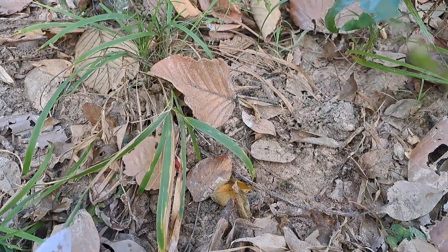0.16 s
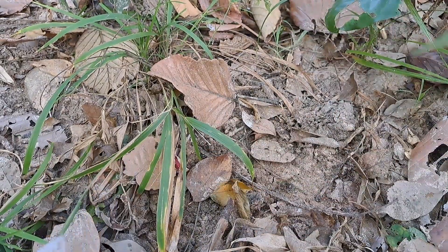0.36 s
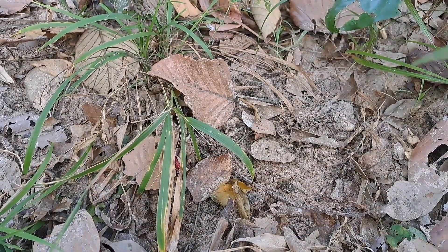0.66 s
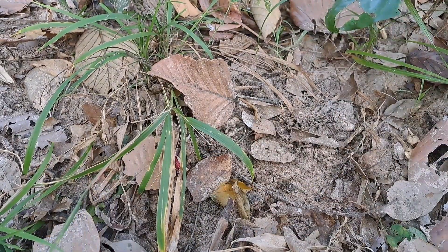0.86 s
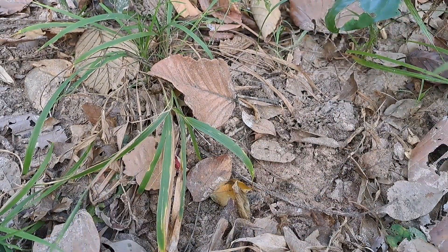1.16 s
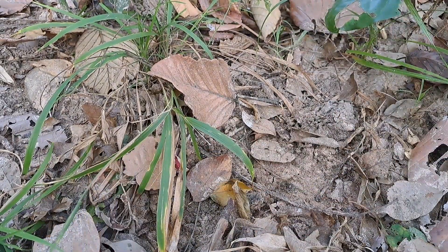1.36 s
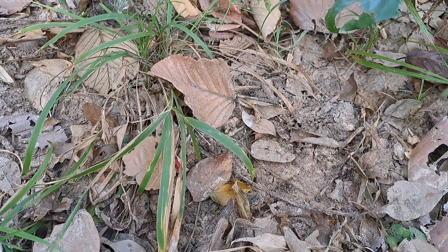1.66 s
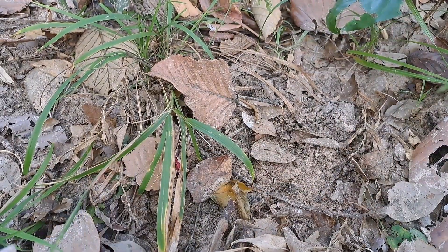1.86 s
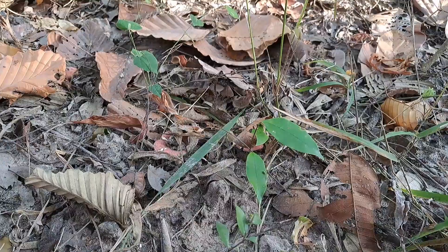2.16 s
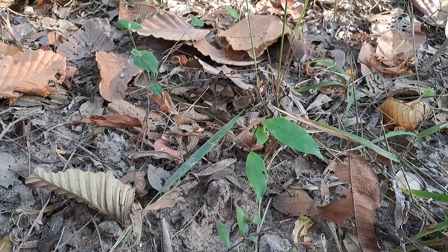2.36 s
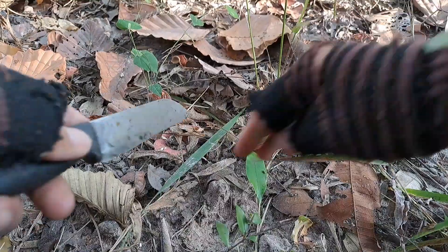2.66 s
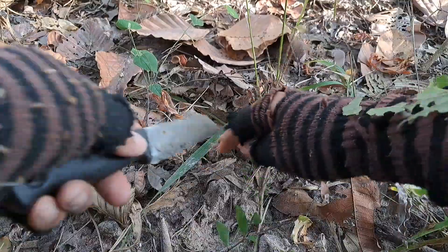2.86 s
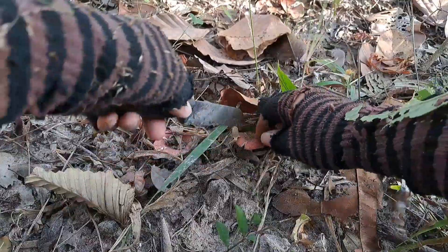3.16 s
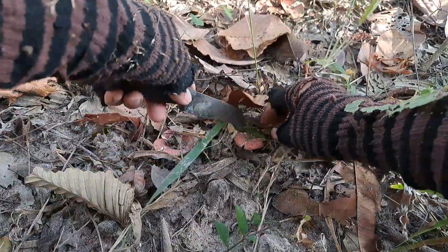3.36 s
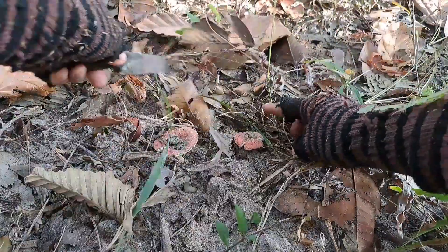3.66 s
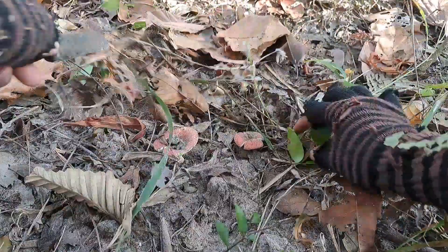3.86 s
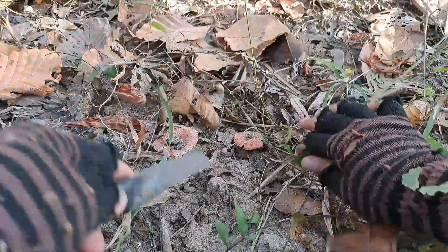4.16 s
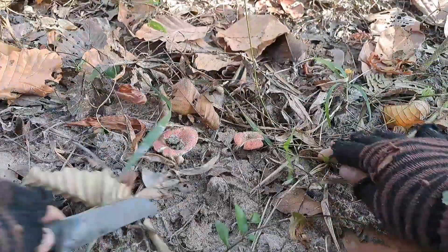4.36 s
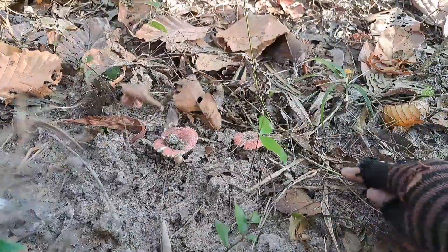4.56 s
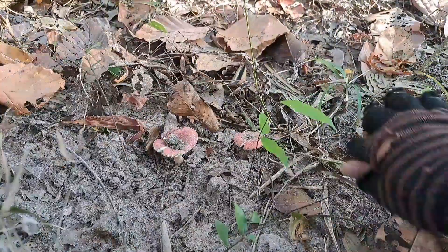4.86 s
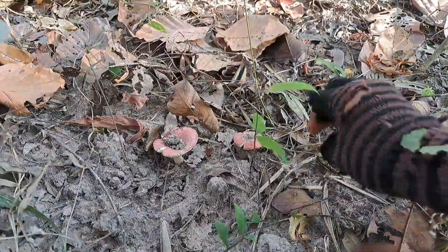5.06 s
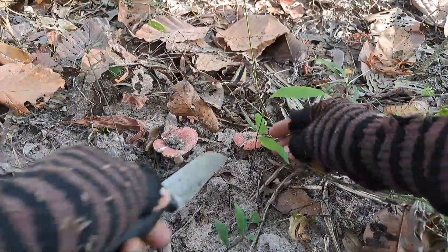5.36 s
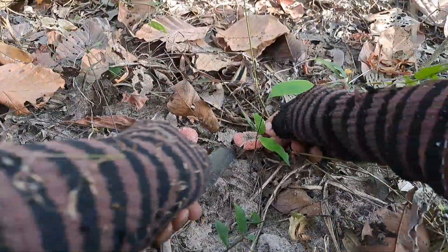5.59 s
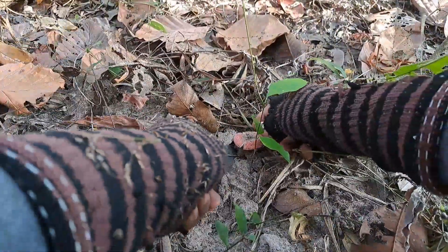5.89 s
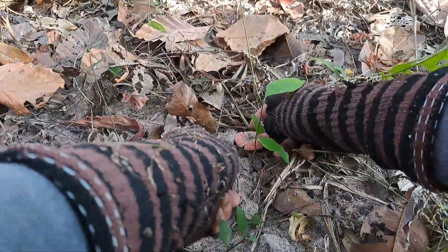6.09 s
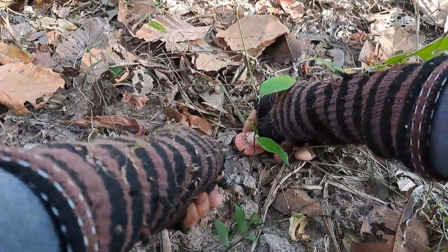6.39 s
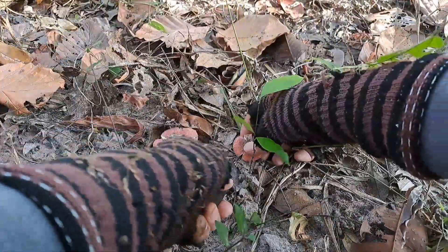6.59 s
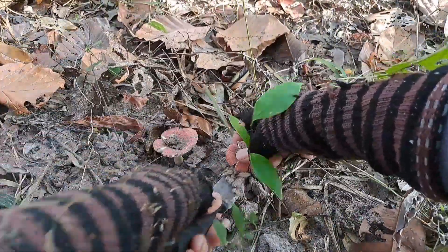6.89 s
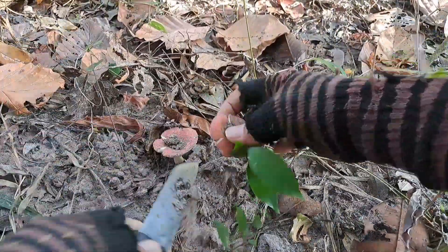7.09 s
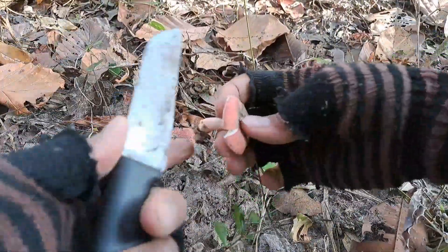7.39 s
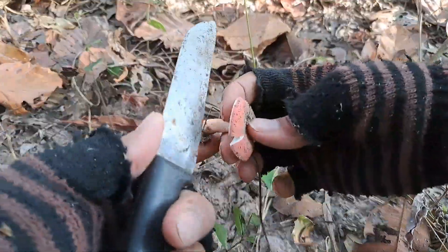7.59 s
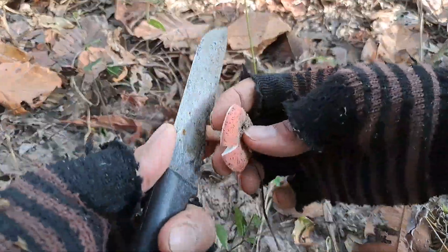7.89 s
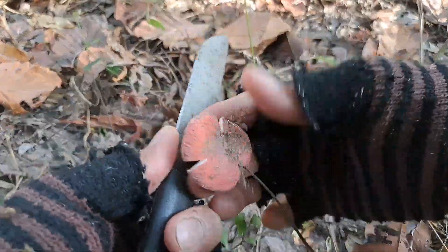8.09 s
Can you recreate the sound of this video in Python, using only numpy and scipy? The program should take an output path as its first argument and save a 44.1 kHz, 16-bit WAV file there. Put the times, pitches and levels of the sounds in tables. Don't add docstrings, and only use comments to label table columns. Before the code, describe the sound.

Close, dry stereo sound of digging in leaf litter. From 0 to 1.2 s, leaves rustle and crackle with low soil thuds, small twig snaps and a bright blade clink near 0.35 s. Around 1.4-1.7 s steel ticks and rings briefly several times against ground; then it nearly quiets. At about 1.96 s the scene changes abruptly: light rustling, soft bumps, then a sharp crack at 2.9 s. Loud crisp raking bursts at 3.4-3.9 s, with snapping stems and a hollow thud near 3.8 s. Hard cracks come around 4.2 s, and the densest sweeping at 4.4-4.9 s, a large curled leaf dragging raspily. A brief crackle at 5.35 s leads to quieter prying, a faint high squeak near 5.8 s, grass slides at 6.5-7 s, and rustling. After 7.3 s it almost stops, with small stem ticks and scrapes near 8 s. Soft low rumble and distant air lie underneath.

```python
import sys
import numpy as np
from scipy import signal
from scipy.fft import rfft, irfft, next_fast_len
from scipy.io import wavfile
from scipy.ndimage import uniform_filter1d, map_coordinates

SR = 44100
rng = np.random.default_rng(int(sys.argv[2]) if len(sys.argv) > 2 else 0)


def unload_wav(signal):
    wavfile.write(
        sys.argv[1],
        SR,
        np.round(np.clip(np.atleast_2d(signal).T, -1, 1) * 32767).astype(np.int16),
    )


def natural_amplitude(level_db):
    exponent = np.asarray(level_db, float) / 20
    return 10 ** exponent


N = 363207

# [t/s, lead of the left microphone/samples, spread of places/samples]
PLACE = [(0, 20.5, 5), (.9, 22, 5), (1.2, 22, 6), (1.35, -2, 13), (2.1, 1, 12), (2.28, -12, 9),
         (2.5, 0, 12), (2.92, 1.5, 5), (3.45, 1.5, 5), (3.58, 5, 5), (3.85, 8, 6), (4.145, 8, 9),
         (4.17, -6.5, 5), (4.36, -7, 9), (4.42, 12.5, 6), (4.62, 13.5, 5), (4.76, 16, 5), (5.03, 16, 9),
         (5.1, -7, 11), (5.42, -7, 10), (5.65, 3.5, 7), (6.1, 1, 6), (7.05, 2, 6), (7.5, 6, 13),
         (7.9, 7, 4), (8.24, 7.5, 8)]

# [t/s, half length/s, crackle level/dB, depth = soil re crackle/dB]
FUMBLES = [(.14, 0.18, -46.5, -0.5), (.35, 0.14, -59, 3.5), (.52, 0.089, -49.5, -16), (.76, 0.1, -54, -17),
           (.805, 0.012, -51, -26), (.842, 0.016, -49, -32), (.865, 0.022, -41.5, -27),
           (.905, 0.057, -46.5, -0.5), (.962, 0.023, -48.5, -11), (1.02, 0.096, -50.5, -3),
           (1.17, 0.069, -51, 2), (1.475, 0.1, -52.5, -3.5), (1.596, 0.11, -56.5, -2.5),
           (1.788, 0.041, -68, 6), (1.88, 0.047, -66, -10)]
SWEEPS = [(1.996, 0.12, -53.5, -2), (2.265, 0.1, -51.5, -8), (2.68, 0.3, -52.5, -14.5),
          (2.79, 0.27, -62, 5.5), (2.932, 0.033, -33, -15), (3.0, 0.042, -48, -24),
          (3.15, 0.16, -45.5, -17.5), (3.295, 0.22, -48.5, -15), (3.435, 0.034, -44, -2.5),
          (3.467, 0.066, -29.5, -24), (3.503, 0.074, -28.5, -15.5), (3.544, 0.028, -29, -11.5),
          (3.676, 0.071, -31.5, -15), (3.77, 0.085, -34, -19), (3.837, 0.07, -34.5, -5.5),
          (3.957, 0.031, -40.5, -23), (4.208, 0.029, -35, -15.5), (4.41, 0.15, -39, -10.5),
          (4.483, 0.093, -31, -13), (4.532, 0.12, -29.5, -11), (4.577, 0.066, -31, -9.5),
          (4.663, 0.062, -27.5, -10.5), (4.715, 0.079, -31, -12.5), (4.809, .15, -38, -5.5),
          (5.076, 0.043, -55.5, -27), (4.978, 0.017, -53, -20), (5.347, 0.023, -43, -20),
          (5.375, 0.024, -43.5, -7), (5.397, 0.053, -46.5, -9), (2.77, 0.023, -49.5, -11),
          (3.125, 0.025, -46.5, -12)]
PRISES = [(5.76, 0.27, -50.5, -6.5), (5.87, 0.16, -53, -29), (6.036, 0.066, -51.5, -6),
          (6.38, 0.19, -57, -5.5), (6.465, 0.054, -49.5, -26), (6.551, 0.065, -51, -16),
          (6.707, 0.11, -54, -10.5), (6.781, 0.054, -47, -11), (6.92, 0.17, -46.5, -17.5),
          (6.992, 0.03, -44, -23), (7.2, 0.2, -48.5, -10), (7.5, 0.13, -67, 0), (7.967, 0.06, -60.5, -12),
          (8.05, 0.048, -58, -36)]
# [t/s, crackle level/dB, depth/dB]
STIR = [(0, -48, -54), (.62, -60, -15), (1.34, -64, 5), (1.95, -71.5, -9), (1.97, -60.5, 1.5),
        (2.42, -67.5, -2.5), (2.9, -51.5, -2.5), (3.36, -59, 4), (3.6, -42, -5), (4.05, -47.5, -7),
        (4.3, -47.5, -10), (5.0, -60.5, -5.5), (5.5, -53.5, -8.5), (6.2, -61.5, -9), (7.1, -55, -12),
        (7.65, -70.5, -27), (7.87, -82.5, -1), (8.24, -66, -20)]

# [f/Hz, level/dB per Hz]
CRISP = [(2350, -10.5), (4000, -6), (5260, -3.5), (6380, -4.5), (7970, -2), (9030, -4.5), (11500, -2.5),
         (12700, 1), (14900, -0.5), (15600, -6)]
BODY = [(740, -36), (1250, -14.5), (1350, -5.5), (1840, -6.5), (3180, -4), (4000, -4), (5200, -7),
        (8800, -120)]
SOIL = [(190, -9.5), (330, -8.5), (450, -7.5), (589, -5.5), (770, -3), (1040, -10), (1170, -9), (1300, -10),
        (1700, -32), (2750, -120)]

# [t/s, peak level/dB, centre f/Hz, left re right/dB]
STEMS = [(0.5884, -29.5, 3420, -9.5), (0.7193, -33, 2140, 0), (0.857, -34, 5710, -1), (0.898, -28, 3890, 4),
         (1.116, -38, 4270, 4), (1.1555, -36, 2290, -3), (1.1628, -30, 1930, 7), (1.725, -45, 5800, -8),
         (1.754, -49, 5600, -1), (1.8738, -44, 3910, -17), (1.79, -42, 2260, -3), (1.8067, -45, 5200, -10),
         (1.882, -42.5, 3920, -17), (1.9623, -49, 1950, -1), (2.493, -39.5, 1900, 3),
         (2.8988, -29.5, 4770, -7), (2.9344, -27, 5200, -2), (3.2074, -28, 2190, 10.5),
         (3.2979, -25.5, 4580, -7.5), (3.428, -30, 3800, 0), (3.4558, -15, 5350, -5), (3.55, -20, 2100, -2),
         (3.7338, -26, 5000, -1), (3.793, -25, 4400, -2), (3.962, -30.5, 5900, 4.5), (3.537, -29, 8080, 4),
         (3.552, -13, 8100, 3), (4.143, -29.5, 2690, 18.5), (4.144, -29, 4780, 17), (4.199, -19, 6600, -10),
         (4.472, -32, 2870, 1), (4.6577, -26.5, 2800, 4), (4.773, -17, 3380, 3.5), (5.3498, -36, 5330, -9),
         (5.364, -28.5, 2050, -10), (5.372, -36.5, 2210, -16), (5.629, -39, 7930, 20),
         (5.701, -33, 1890, -2.5), (5.8336, -38, 2120, -9), (5.8335, -39, 3600, -7), (5.852, -40, 4500, 0),
         (6.6824, -38, 2050, -7), (6.766, -41, 3240, -5), (6.794, -35, 5280, -1), (7.097, -48, 1790, 2),
         (7.509, -52, 5440, 2), (6.988, -28, 4990, -4), (6.988, -40, 2060, -4), (7.003, -30, 5000, -2),
         (7.9599, -31, 5140, 3), (7.9685, -32.5, 5340, -11)]
# [t/s, peak level/dB, centre f/Hz, left re right/dB]
MORE_STEMS = [(.3227, -37, 2140, -4), (.3345, -32, 2000, -6), (.401, -32, 3700, -5), (.6749, -36, 11900, -1),
              (.7394, -34, 2380, 0), (.856, -38, 12000, 6), (1.7784, -49, 9000, 2), (1.9903, -40, 1720, -2),
              (2.1061, -46, 7000, -1), (2.2974, -37, 5200, -2), (3.2384, -31, 9800, 3), (3.2574, -33, 2240, 6),
              (3.292, -27, 11000, -6), (3.3278, -36.5, 7420, -1), (3.4391, -29, 11400, 2),
              (3.6504, -28, 9100, -2), (3.7654, -28, 7110, -2.5), (4.198, -20, 9800, -12), (4.39, -29, 14000, 2),
              (4.6504, -21, 12800, -10), (4.7414, -28, 2750, 6), (5.3056, -44, 4480, -2),
              (5.3221, -37, 4500, -6), (5.3954, -35, 7770, -12), (5.4294, -39, 2160, -5),
              (5.6034, -48, 2500, -3), (6.1876, -46, 8260, 0), (6.2794, -39.5, 2210, -1),
              (6.3203, -61, 2310, -1), (7.4318, -41, 12900, -5), (7.9309, -51, 5800, 0), (7.94, -49, 6500, -4),
              (7.9544, -44, 5220, -5)]
# [t/s, peak level/dB, left re right/dB]
RIBS = [(.0263, -36, 4), (0.323, -40, -4), (0.8033, -32.5, -11), (0.834, -39, 1), (1.098, -36.5, 4),
        (2.4, -48, 2), (2.58, -48, 2), (4.977, -37, -5), (5.374, -25, -19), (7.547, -44, 0),
        (2.9217, -29, 7), (2.925, -18.5, 5.5), (3.735, -21, -1.5), (3.737, -26, 0), (3.788, -20, 11),
        (4.1917, -19.5, -18), (4.198, -21.5, -14.5), (4.301, -26, -8), (4.375, -26, 4), (4.6289, -27, 3),
        (4.6594, -26, 13), (5.336, -34, -2.5), (7.5067, -37, -4)]

# [t/s, peak level/dB, centre f/Hz]
THUDS = [(0.144, -34.5, 268), (0.223, -39, 209), (0.269, -33.5, 206), (0.324, -34.5, 620),
         (0.334, -35, 623), (0.91, -28, 900), (.912, -34.5, 457), (3.46, -38, 1000), (3.55, -38, 800),
         (0.915, -54, 243), (1.147, -34.5, 363), (1.169, -40.5, 159), (1.433, -39.5, 905),
         (1.436, -37, 432), (1.445, -42.5, 186), (1.473, -45, 207), (1.54, -31.5, 466), (1.595, -38.5, 650),
         (1.801, -49, 474), (4.929, -43, 527), (1.638, -40, 493), (1.647, -40, 475), (2.43, -49, 294),
         (2.473, -41, 270), (3.494, -42, 960), (3.809, -26, 307), (3.8087, -34, 925), (3.827, -23.5, 765),
         (4.514, -23.5, 301), (4.84, -32.5, 123), (5.05, -45, 376), (5.236, -46, 376), (6.839, -43, 248),
         (7.371, -48, 920), (7.372, -43, 420), (2.768, -43, 700), (2.3, -46, 350), (2.347, -45, 450),
         (2.635, -49, 750), (2.7, -44, 261)]

# [t/s, peak level/dB, low mode re peak/dB, long ring re peak/dB, left re right/dB]
CLINKS = [(.3505, -19.5, -14, -24, -14), (0.4, -32, -5, -40, -8), (1.4025, -34, -26, -19, -5.5),
          (1.4493, -28, -22, -45, -5), (1.471, -36, -21, -30, -3), (1.4775, -26.5, -28, -40, -9),
          (1.4995, -42, -8, -40, 1), (1.54, -31, -14, -24, -9.5), (1.544, -33, -8, -30, -9),
          (1.6405, -17.5, -12, -17.5, 8), (1.6449, -22, -3, -30, 8), (1.6675, -38, 2, -40, 11)]
# [f/Hz, level/dB, t60/s]
BLADE_MODES = [(12800, -29, .02), (12900, -20, .012), (13670, -0.5, 0.015), (13900, -25, .012)]

# [t/s, resonance f/Hz, level/dB]
CURL = [
    (4.44, 2690, -57.5),
    (4.48, 2810, -47.5),
    (4.535, 2604, -42),
    (4.58, 2414, -41),
    (4.62, 2203, -71),
    (4.68, 2500, -54.5),
    (4.77, 3020, -56),
    (4.85, 2240, -54),
    (4.96, 2200, -74),
]
# [t/s, resonance f/Hz, level/dB]
GRASS = [
    (6.45, 2826, -73),
    (6.56, 2360, -64.5),
    (6.65, 2303, -74.5),
    (6.79, 3100, -65),
    (6.93, 2504, -62.5),
    (7.03, 2410, -67.5),
]
# [t/s, resonance f/Hz, level/dB]
SQUEAK = [
    (5.745, 6570, -68),
    (5.795, 6130, -67),
    (5.83, 5800, -70),
    (5.845, 5330, -67),
    (5.875, 5300, -70),
    (5.895, 5600, -77),
    (5.91, 6150, -70),
    (5.928, 6400, -67),
    (5.942, 7100, -69),
]
# [t/s, resonance f/Hz, level/dB]
SCRAPE = [
    (7.896, 5400, -73),
    (7.915, 5680, -77),
    (7.925, 5600, -95),
    (7.935, 5800, -67),
    (7.99, 5180, -89),
    (8.0, 5060, -69),
    (8.035, 5100, -66),
    (8.07, 5070, -74),
    (8.09, 5200, -87),
]

# [f/Hz, level/dB per Hz]
GOUGES = [(0.147, .1, -46), (.91, 0.032, -43), (3.48, .06, -41), (3.552, 0.065, -42), (3.692, 0.073, -47),
          (3.814, 0.042, -42), (4.52, 0.17, -48), (4.698, .1, -48), (5.743, 0.17, -59), (6.5, 0.19, -62.5),
          (1.15, 0.039, -50), (6.145, 0.085, -65), (6.9, .2, -69)]
HOLLOW = [(560, -50), (720, -3.5), (900, -4.5), (1050, -0.5), (1250, -46)]

# [t/s, half length/s, rumble level/dB]
JOLTS = [(0.203, 0.2, -55.5), (1.147, 0.07, -47), (1.45, 0.066, -54), (1.794, 0.072, -52.5),
         (2.053, 0.31, -57), (2.82, 0.67, -57.5), (3.225, 0.067, -53.5), (3.66, .2, -55.5),
         (4.297, 0.4, -56), (4.57, 0.2, -53), (4.85, 0.17, -61), (5.413, 0.14, -55.5), (5.753, 0.78, -58),
         (7.117, 0.57, -54), (8.24, 0.23, -60)]
# [t/s, half length/s, level/dB]
GUST = [
    (7.873, 0.14, -75),
]
# [f/Hz, level/dB per Hz]
RUMBLE = [(13, -60), (24, -29), (35, -12.5), (54, 6.5), (71, 4), (97, -9.5), (110, -6), (140, -33.5),
          (240, -120)]
GROUND = [(65, -20.5), (110, 4), (199, -0.5), (243, -0.5), (330, -12), (430, -32.5), (730, -120)]
DRONE = [(180, -40), (300, -3.5), (519, -2), (614, -4), (870, -21), (1500, -60)]
AIR = [(400, -39), (870, -20), (3890, -32), (4370, -33.5), (5610, -27.5), (13500, -24), (16000, -30)]

RESTART_S = 1.961


def leaves():
    effort_db = raking(0)
    body_db = raking(0.42) - effort_db
    soil_db = raking(1) - effort_db
    pan_db = -3.5 + 0.14 * curves(PLACE)[0]
    tilt_db = 0.0917 * (effort_db + 49.5)
    level_tilt = np.zeros(N)
    restarted = np.arange(N) / SR >= RESTART_S

    sparse = np.clip((-35.5 - effort_db) / 25, 0.25, 1.2)
    slips = natural_amplitude(sparse * (0.13 * wobble(54) + 0.99 * wobble(120) + 0.9 * wobble(400)))

    crisp = grains(CRISP, count=90000, size=28, low_hz=3360, high_hz=16250, cycles=1.22, tail_db=2.0,
                   smooth=0.87, clump_db=1.06, narrow=0.4, pan_db=11.0)
    body = grains(BODY, count=30000, size=90, low_hz=1250, high_hz=4110, cycles=2.0, tail_db=1.0,
                  smooth=0.41, clump_db=1.16, narrow=0.28, pan_db=9.5)
    soil = grains(SOIL, count=9000, size=280, low_hz=291.0, high_hz=1426, cycles=2.0, tail_db=0.5,
                  smooth=0.22, clump_db=-0.43, narrow=0.12, pan_db=6.0)
    soil = unit(soil + np.where(restarted, 0.4, 0) * np.roll(soil, 38, axis=1))

    top = natural_amplitude(2.5) * patched(crisp, 1.2, tilt_db) * sides(2)[:, None]
    under = natural_amplitude(body_db - 1.58) * patched(body, 1.8, level_tilt)
    under = under + natural_amplitude(soil_db - 1.18) * patched(soil, 2.2, level_tilt)
    under = under + np.where(restarted, 0.27, 0.18) * np.roll(under, 19, axis=1)
    return (top + under) * unit(slips) * natural_amplitude(effort_db) * sides(pan_db)


def raking(per_depth):
    def strokes(rows):
        s, half_s, db, depth_db = np.transpose(rows)
        return swells(s, half_s, db + per_depth * depth_db)

    power = np.where(np.arange(N) / SR < RESTART_S, strokes(FUMBLES), strokes(SWEEPS + PRISES))
    stir_db, stir_depth_db = curves(STIR)
    return 10 * np.log10(power + natural_amplitude(2 * (stir_db + per_depth * stir_depth_db)))


def grains(points, count, size, low_hz, high_hz, cycles, tail_db, smooth, clump_db, narrow, pan_db):
    lead, spread = curves(PLACE)
    u = rng.random((count, 4))
    g = rng.standard_normal((count, 2))
    start = (u[:, 0] * N).astype(int)
    hz = low_hz * (high_hz / low_hz) ** u[:, 1]
    turns = hz[:, None] * np.arange(size) / SR
    waves = np.sin(2 * np.pi * (turns + u[:, 3:])) * np.exp(-turns / cycles)
    strength = natural_amplitude(-tail_db * np.log(u[:, 2:3] + 0.0095))
    waves *= strength / np.linalg.norm(waves, axis=1, keepdims=True)
    grain_lead = lead[start] + narrow * spread[start] * g[:, 1] ** 3
    cracks = unit(laid(start, waves, pan_db * g[:, 0], grain_lead))
    mix = cracks + smooth * rng.standard_normal((2, N))
    clumps = natural_amplitude(clump_db * (0.79 * wobble(40) + 0.92 * wobble(130)))
    return unit(coloured(mix, points) * clumps)


def patched(x, patchy_db, tilt_db):
    hz, t, z = signal.stft(x, SR, nperseg=512)
    field = uniform_filter1d(rng.standard_normal(z.shape[1:]), size=6, axis=0)
    field = uniform_filter1d(field, size=14, axis=1)
    frame = np.minimum(t * SR, N - 1).astype(int)
    slope = np.log2((hz[:, None] + 1) / 8000) * tilt_db[frame]
    z = z * natural_amplitude(patchy_db * unit(field) + slope)
    return unit(signal.istft(z, SR, nperseg=512)[1][:, :N])


def snaps():
    ribs = [(s, db, 13260 * (1 + 0.033 * rng.uniform(-0.55, 1)), pan_db) for s, db, pan_db in RIBS]
    s, db, hz, pan_db = np.transpose(STEMS + ribs + MORE_STEMS)
    t = np.arange(500) / SR
    g = rng.standard_normal((len(s), 2, len(t)))
    tone = np.cos(2 * np.pi * hz[:, None] * t) * (0.38 + 1.5 * uniform_filter1d(g[:, 0], size=6))
    tick = 0.71 * (g[:, 1] - uniform_filter1d(g[:, 1], size=14))
    burst = tone * natural_amplitude(-60 * t / 0.022) + tick * natural_amplitude(-60 * t / 0.012)
    burst *= 1 - np.exp(-t / 0.00018)
    burst /= np.abs(burst).max(axis=1, keepdims=True)
    start, lead = placed(s)
    return laid(start, burst * natural_amplitude(db)[:, None], pan_db, lead)


def thuds():
    s, db, hz = np.transpose(THUDS)
    turns = hz[:, None] * np.arange(1800) / SR
    crunch = uniform_filter1d(rng.standard_normal(turns.shape), size=13)
    crunch = uniform_filter1d(crunch, size=9)
    push = np.sin(2 * np.pi * turns) + 2.43 * hz[:, None] / 450 * crunch
    push *= np.exp(-turns / 1.8) * (1 - np.exp(-turns / 0.46))
    start, lead = placed(s)
    return laid(start, push * natural_amplitude(db + 0.5)[:, None], 0 * s - 1.5, lead)


def blade():
    s, db, low_db, ring_db, pan_db = np.transpose(CLINKS)
    low_db, ring_db = low_db[:, None], ring_db[:, None]
    t = np.arange(3600) / SR

    def mode(hz, level_db, t60):
        return natural_amplitude(level_db - 60 * t / t60) * np.sin(2 * np.pi * hz * t)

    modes = len(BLADE_MODES)
    chance_db = rng.normal(0, 2.0, (len(s), modes))
    grit = rng.standard_normal((len(s), modes, len(t)))
    chatter = 1.27 + 1.34 * uniform_filter1d(grit, size=14)
    short = 0
    for k, (hz, level_db, t60) in enumerate(BLADE_MODES):
        short = short + mode(hz, level_db + chance_db[:, k:k + 1], t60) * chatter[:, k]
    tick = rng.standard_normal((len(s), len(t))) * natural_amplitude(-10.0 - 60 * t / 0.0038)
    low = mode(6950, low_db, 0.015) * (1 - np.exp(-t / 0.00032)) * chatter[:, 0]
    pair = mode(12300, ring_db, 0.33) + mode(12321, ring_db + 3.5, 0.33)
    damped_s = 0.075 + 0.003 * (db[:, None] + 18)
    pair = pair * np.clip((damped_s - t) / 0.012, 0, 1)
    clink = (short + tick + low + pair) * natural_amplitude(db - 7.0)[:, None]
    return laid(np.round(s * SR), clink, pan_db, 0 * s)


def rubbing(rows, width_hz, rough_db, steady):
    hz, db = curves(rows)
    t = np.arange(N) / SR
    on = (t > rows[0][0]) & (t < rows[-1][0])

    def friction():
        return (steady + wobble(width_hz)) * natural_amplitude(rough_db * wobble(90))

    near = friction()
    apart = np.array([friction(), friction()])
    tone = np.sin(2 * np.pi * np.cumsum(hz) / SR)
    return spaced(on * natural_amplitude(db + 8) * (near + 1.3 * apart) * tone)


def gouges():
    grit = noise(HOLLOW, 0.92) * natural_amplitude(1.4 * wobble(45) + 3.4 * wobble(150))
    return unit(spaced(grit)) * np.sqrt(swells(*np.transpose(GOUGES)))


def woods():
    calm_db, still_db, shake_db = -66.5, -63, -7.5
    rumble_db = 10 * np.log10(swells(*np.transpose(JOLTS)) + natural_amplitude(2 * calm_db))
    ground_db = 10 * np.log10(natural_amplitude(2 * (raking(1.34) + shake_db)) + natural_amplitude(2 * still_db))
    low = natural_amplitude(rumble_db) * noise(RUMBLE, 0.96)
    low = low + natural_amplitude(ground_db + 1.74 * wobble(25)) * noise(GROUND, 0.96)
    hiss = natural_amplitude(-75.0) * noise(AIR, 0.1)
    drone = (natural_amplitude(-78) + np.sqrt(swells(*np.transpose(GUST)))) * noise(DRONE, 0.85)
    return low * sides(-0.88)[:, None] + hiss + drone


def swells(s, half_s, db):
    off = (np.arange(0, N + 128, 128) / SR - s[:, None]) / half_s[:, None]
    off = np.where(off < 0, -off / 0.79, off)
    power = natural_amplitude(2 * (db[:, None] - 12.5 * off ** 1.22)).sum(axis=0)
    return np.interp(np.arange(N) / 128, np.arange(len(power)), power)


def noise(points, alike):
    a, b = rng.standard_normal((2, N))
    turn = np.arccos(np.clip(alike, -1, 1)) / 2
    return coloured(np.cos(turn) * a + np.sin(turn) * np.array([b, -b]), points)


def coloured(x, points):
    m = next_fast_len(N + 8192)
    f, db = np.transpose(points)
    gain = natural_amplitude(np.interp(np.log(np.fft.rfftfreq(m, 1 / SR) + 1), np.log(f + 1), db))
    return unit(irfft(rfft(x, m) * gain, m)[..., :N])


def wobble(rate):
    return map_coordinates(rng.standard_normal(int(N * rate / SR) + 4), [np.arange(N) * rate / SR])


def curves(rows):
    s, *cols = np.transpose(rows)
    return [np.interp(np.arange(N) / SR, s, c) for c in cols]


def unit(x):
    return x / np.sqrt(np.mean(x ** 2) + 1e-20)


def sides(pan_db):
    return natural_amplitude(np.array([pan_db, -pan_db]) / 2)


def placed(times):
    start = np.round(times * SR)
    return start, curves(PLACE)[0][start.astype(int)]


def laid(start, waves, pan_db, lead):
    size = waves.shape[1]
    out = []
    for gain, shift in zip(sides(pan_db), (-lead / 2, lead / 2)):
        first = np.clip(np.floor(start + shift), 0, N).astype(int)
        at = first[:, None] + np.arange(size)
        out.append(np.bincount(at.ravel(), (waves * gain[:, None]).ravel(), N + 2 * size)[:N])
    return np.array(out)


def spaced(x):
    later = np.clip(np.arange(N) - np.round(curves(PLACE)[0]), 0, N - 1).astype(int)
    return np.array([x[0], x[1, later]])


def scene():
    rubs = rubbing(CURL, width_hz=800, rough_db=-1.0, steady=0)
    rubs = rubs + rubbing(GRASS, width_hz=1300, rough_db=3.0, steady=0)
    squeaks = rubbing(SQUEAK, width_hz=520, rough_db=1.8, steady=0.75)
    squeaks = squeaks + rubbing(SCRAPE, width_hz=1900, rough_db=2.5, steady=0)
    return leaves() + snaps() + thuds() + blade() + rubs + squeaks + gouges() + woods()


def top_cut(x):
    return signal.sosfilt(signal.butter(12, 16830, fs=SR, output="sos"), x)


def record(dry):
    limited = irfft(rfft(dry) * (np.fft.rfftfreq(N, 1 / SR) < 15750), N)
    return top_cut(limited)


dry = scene()
out = record(dry)
unload_wav(out)
```